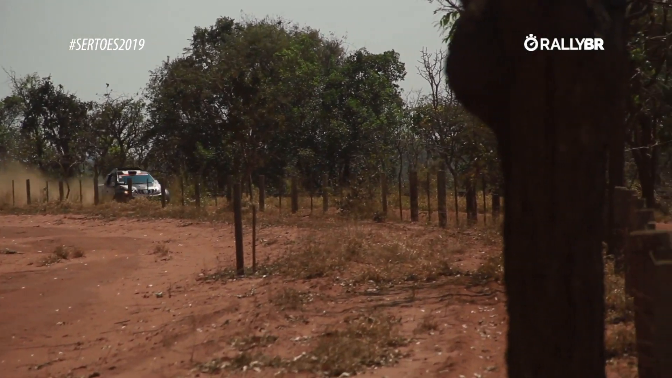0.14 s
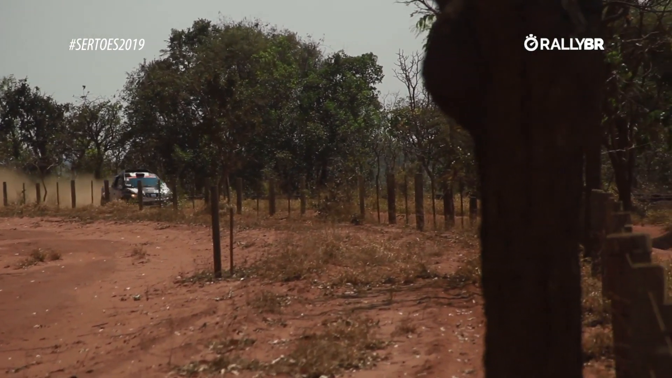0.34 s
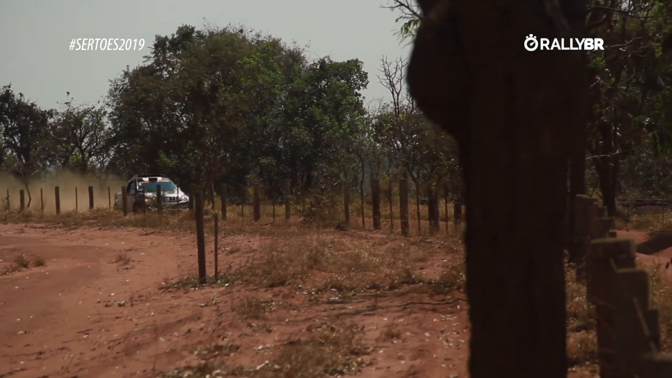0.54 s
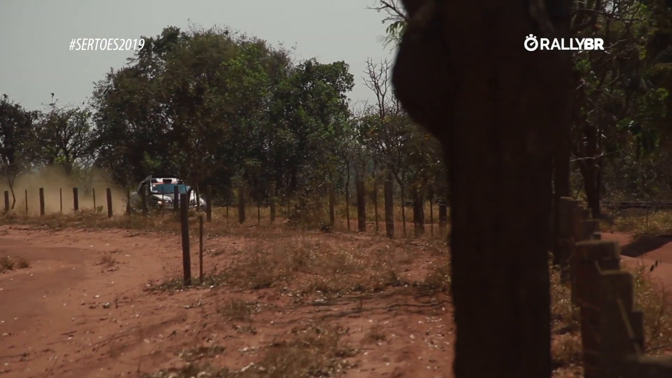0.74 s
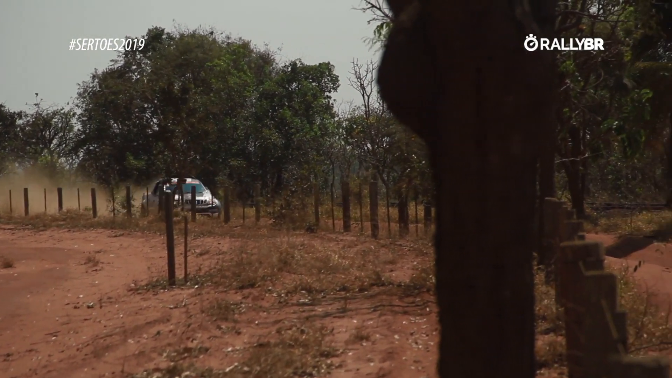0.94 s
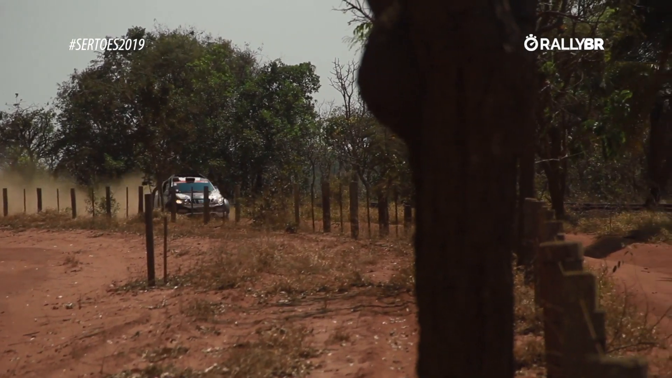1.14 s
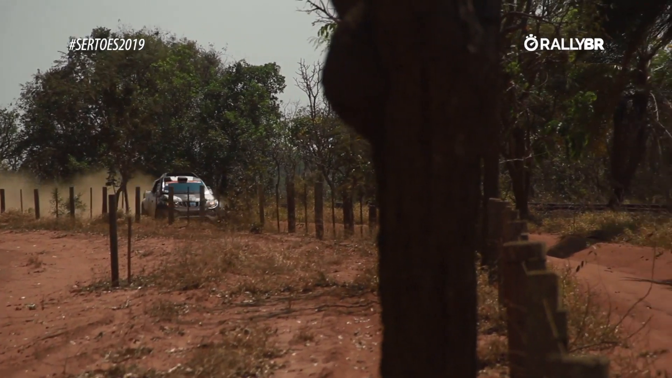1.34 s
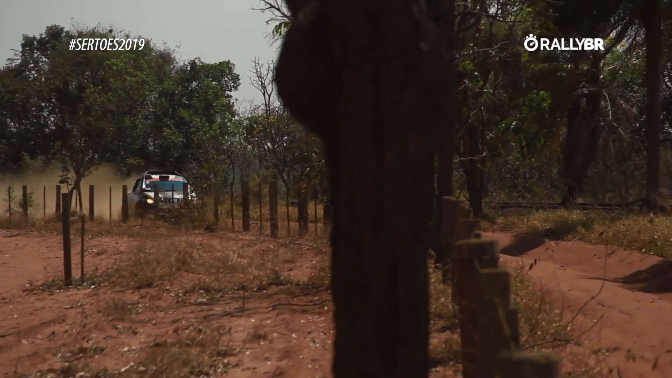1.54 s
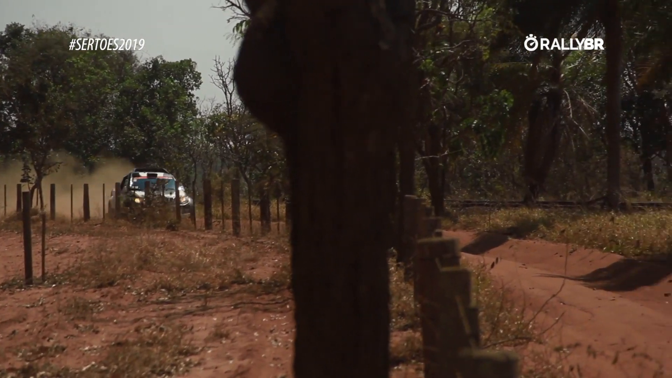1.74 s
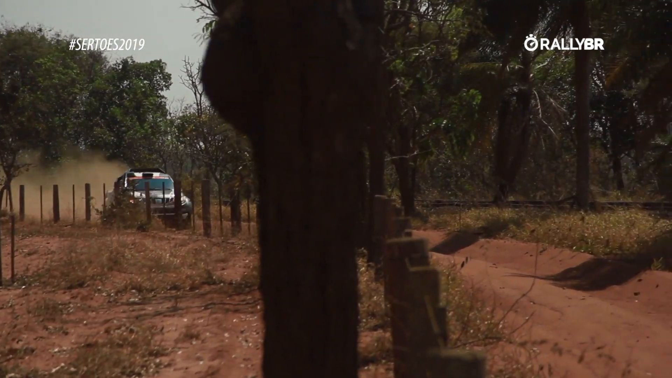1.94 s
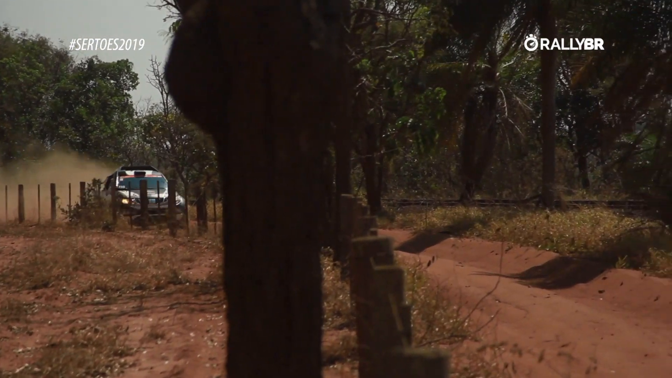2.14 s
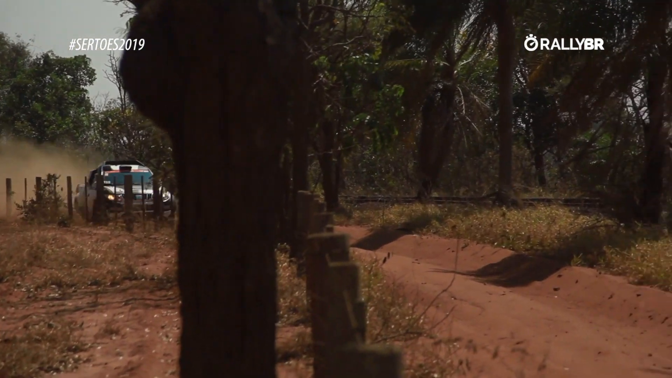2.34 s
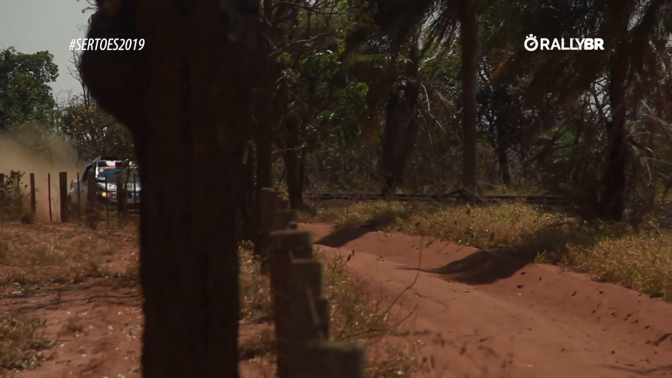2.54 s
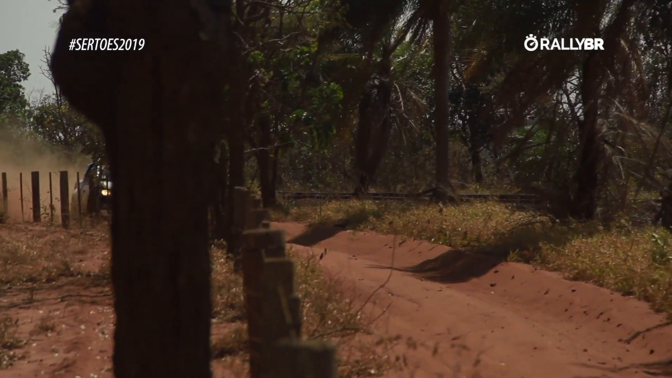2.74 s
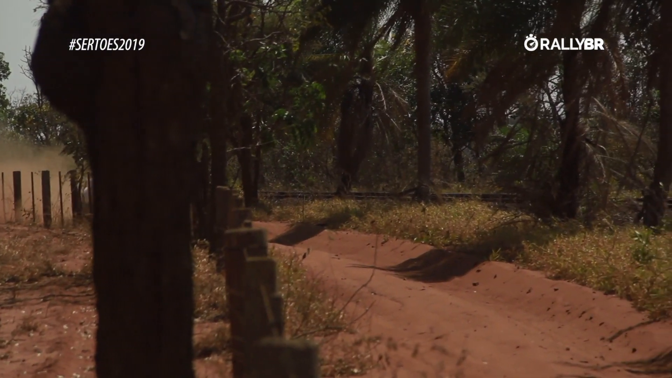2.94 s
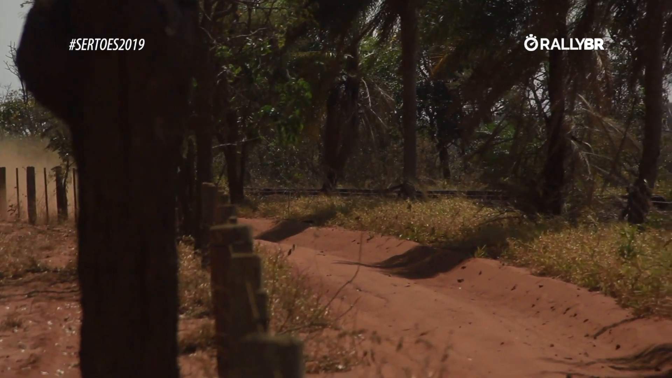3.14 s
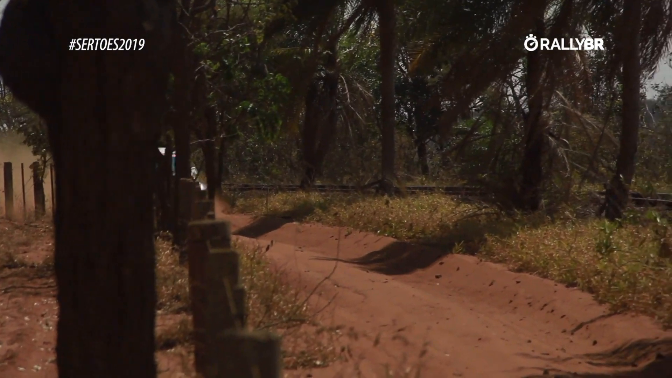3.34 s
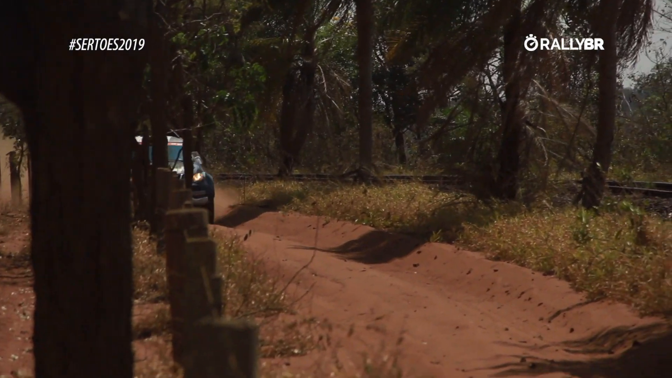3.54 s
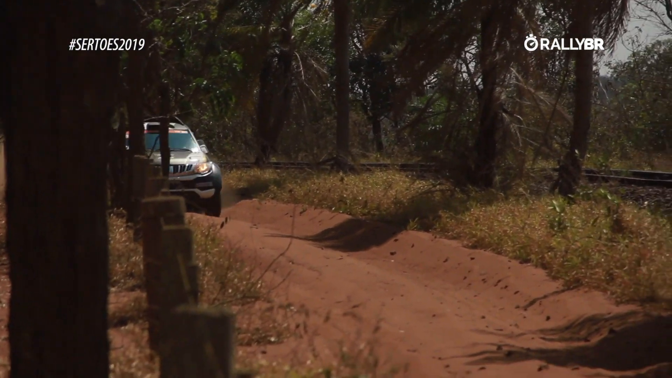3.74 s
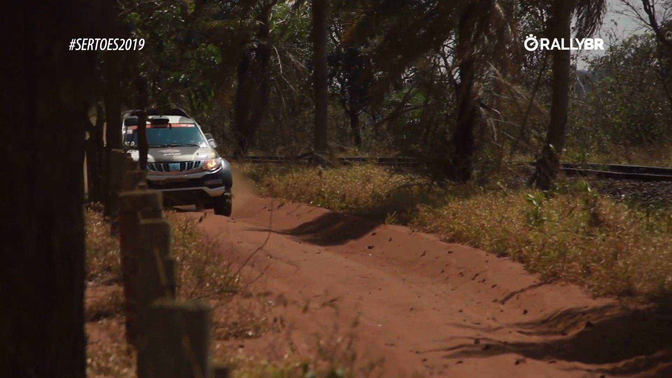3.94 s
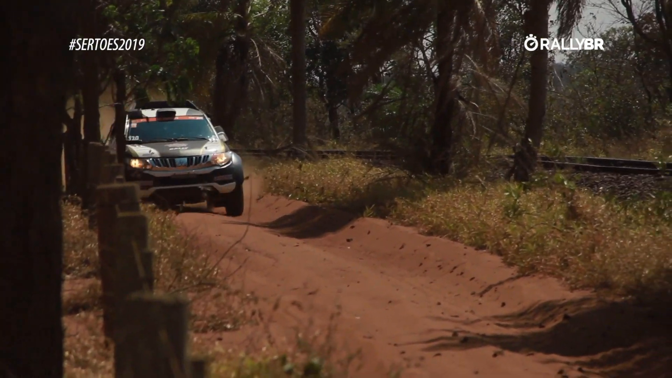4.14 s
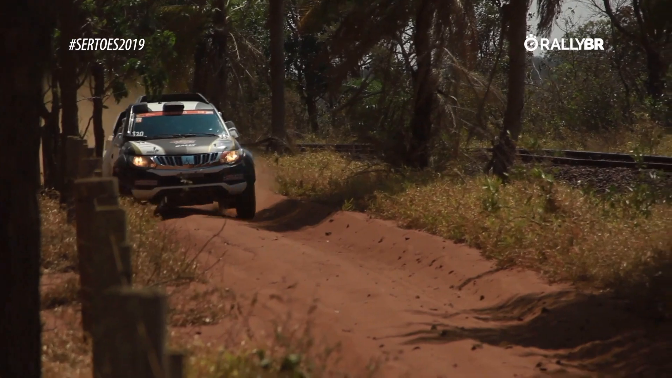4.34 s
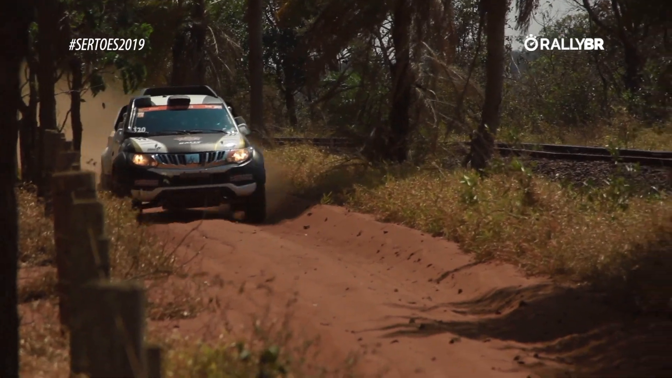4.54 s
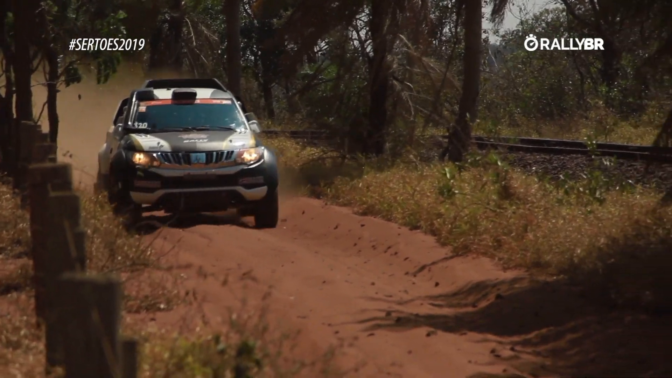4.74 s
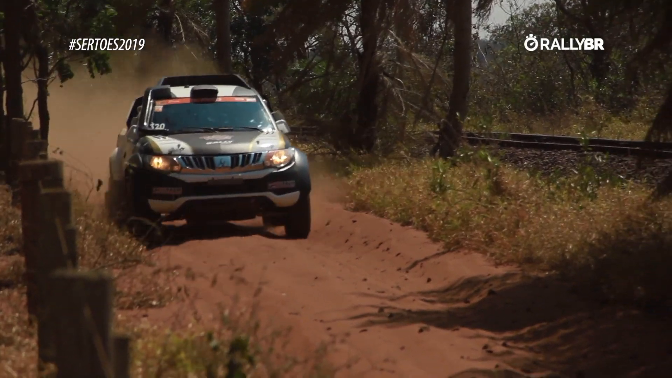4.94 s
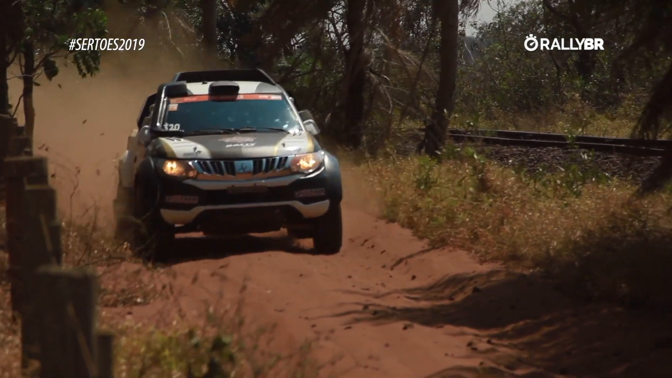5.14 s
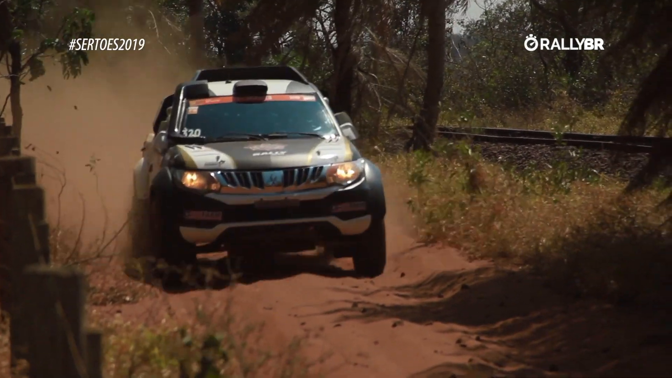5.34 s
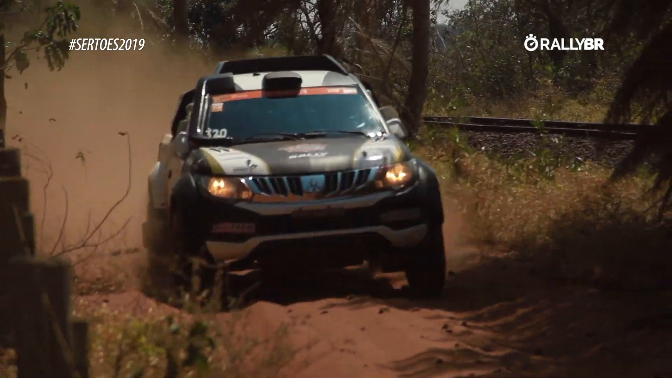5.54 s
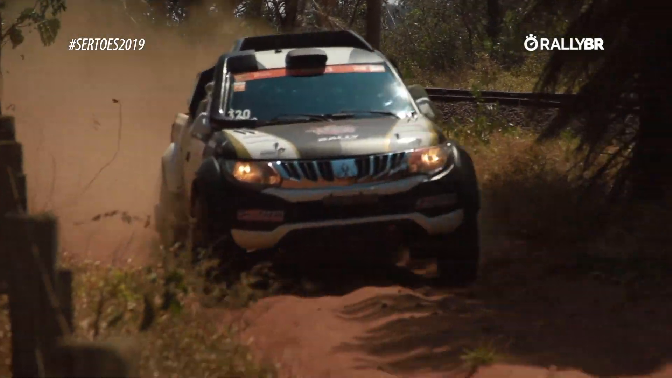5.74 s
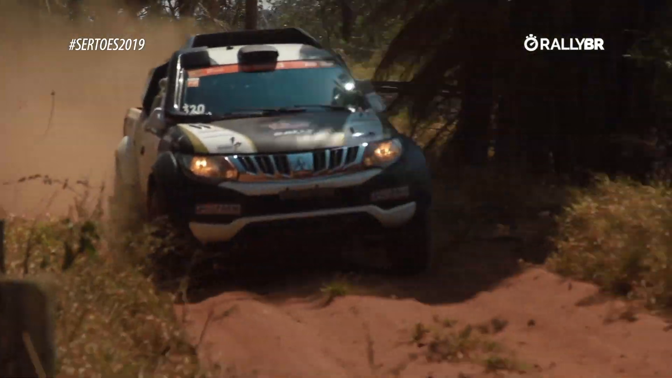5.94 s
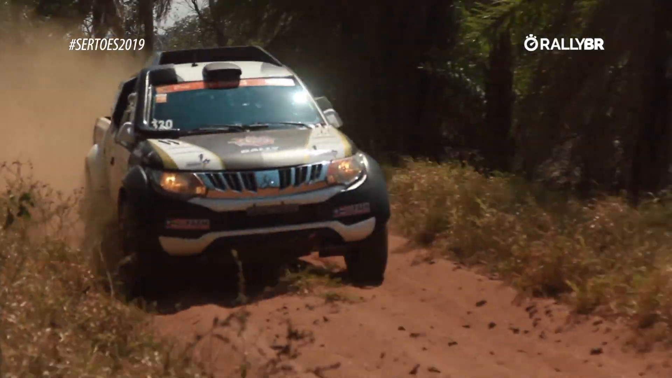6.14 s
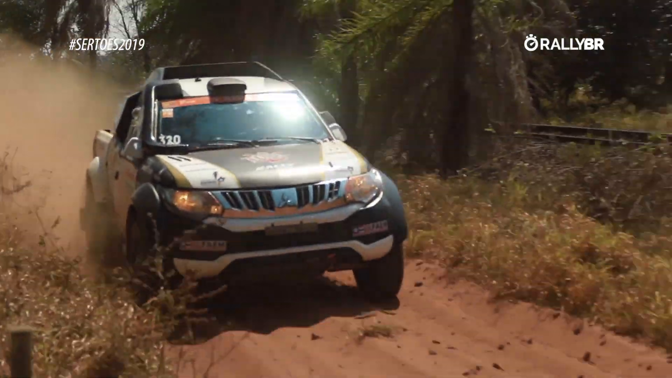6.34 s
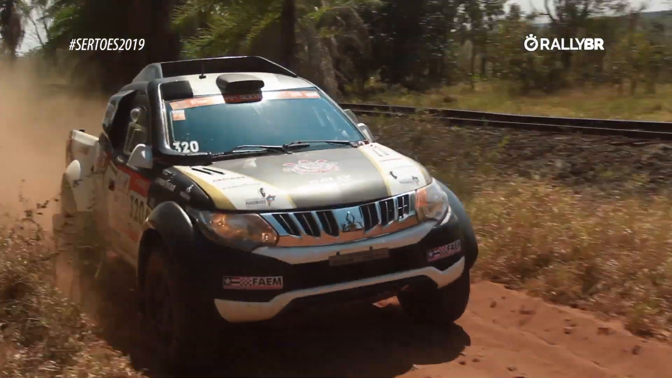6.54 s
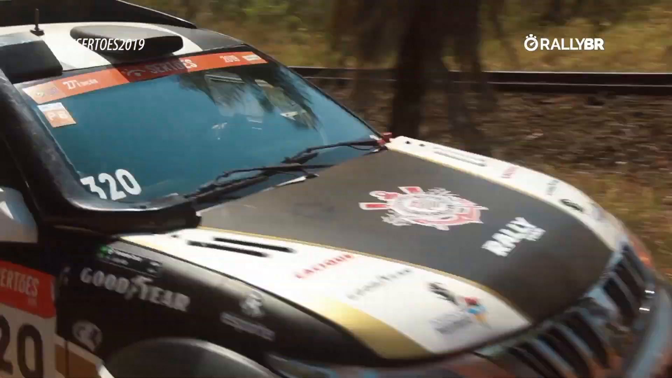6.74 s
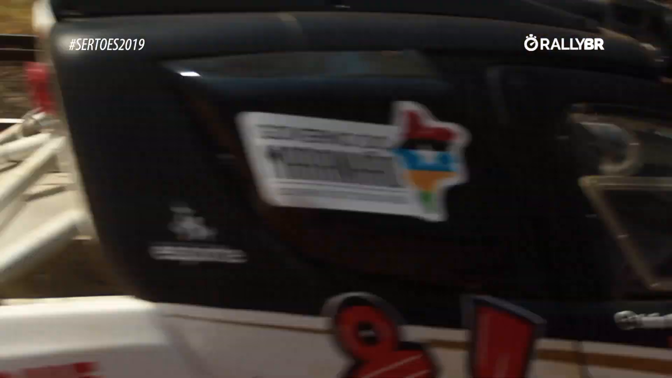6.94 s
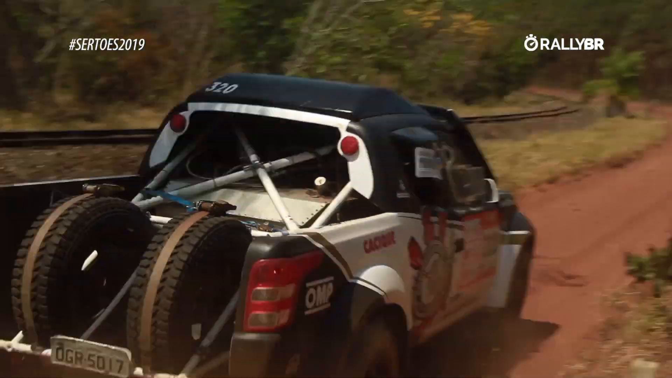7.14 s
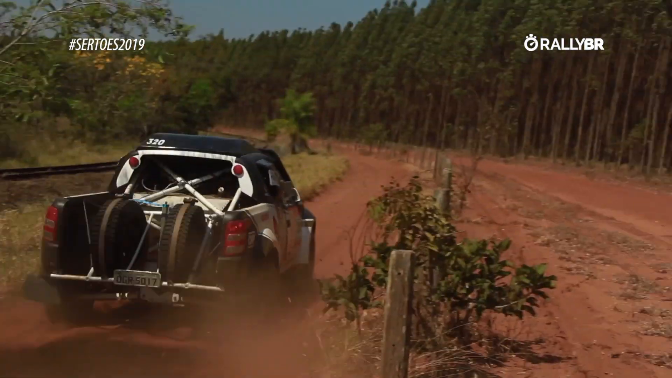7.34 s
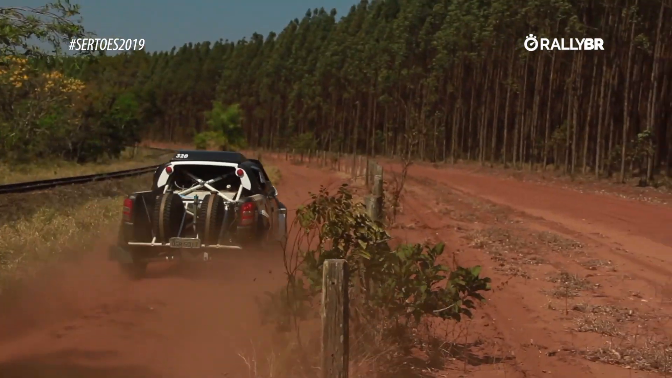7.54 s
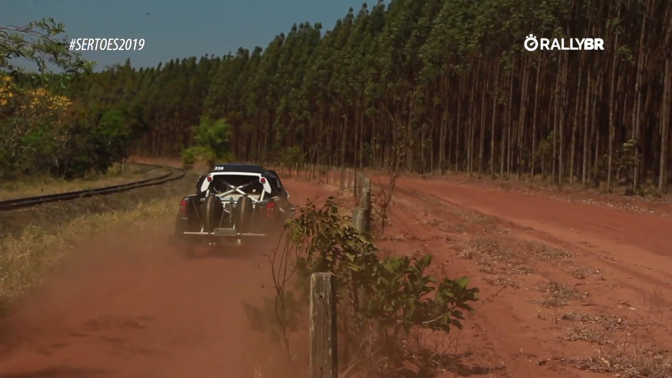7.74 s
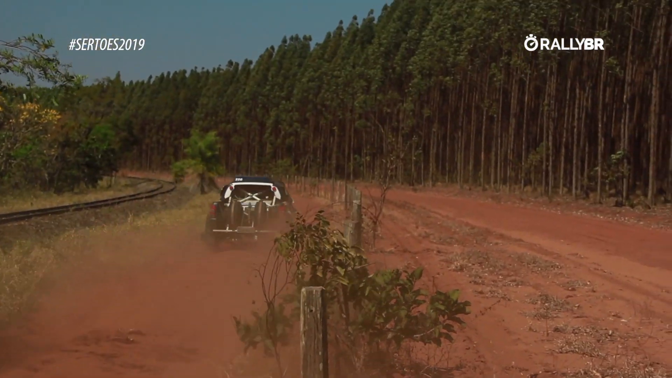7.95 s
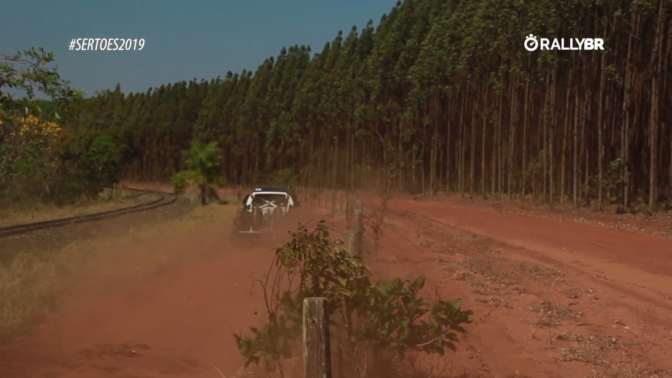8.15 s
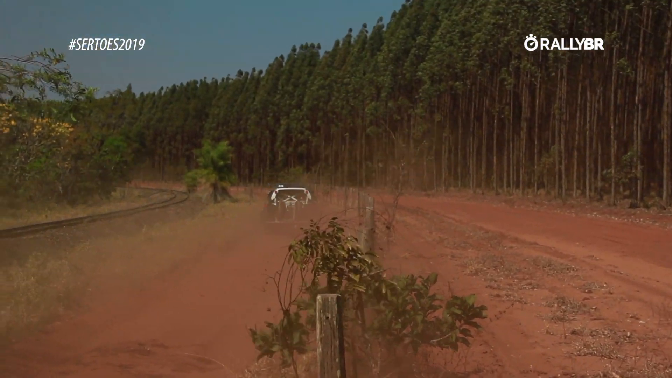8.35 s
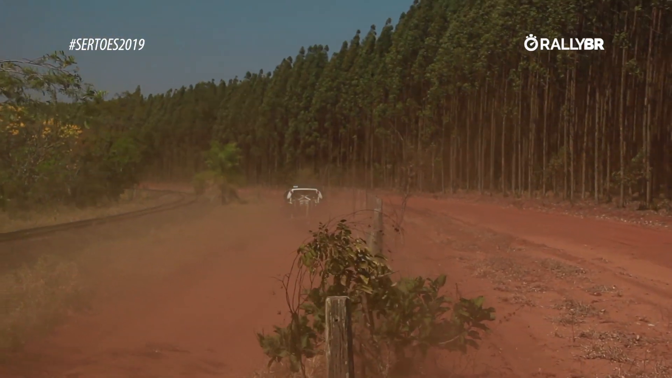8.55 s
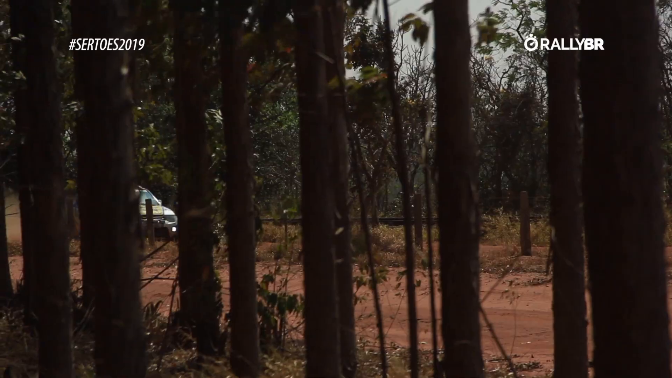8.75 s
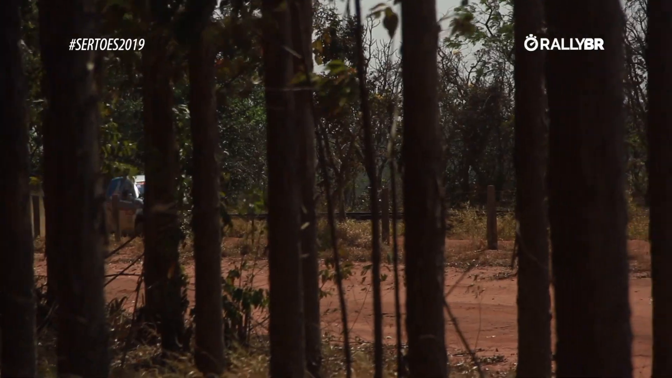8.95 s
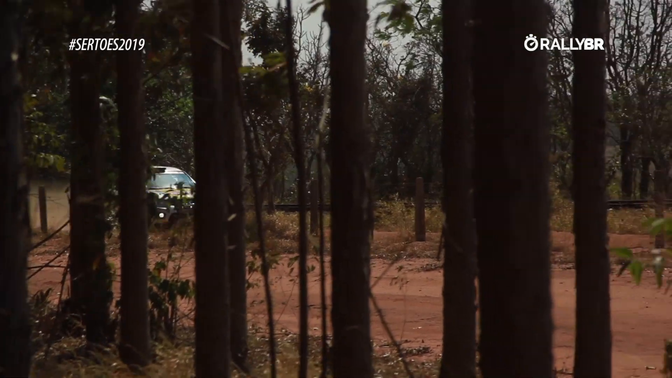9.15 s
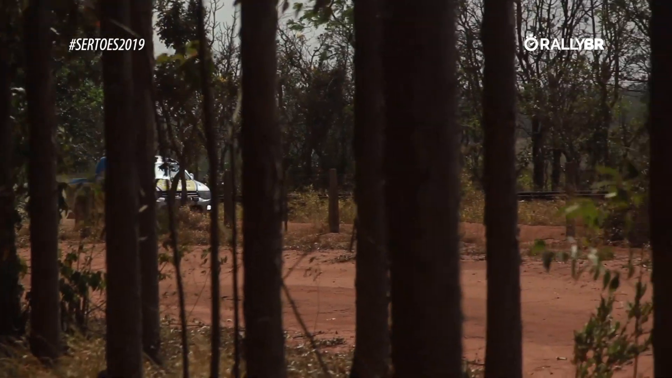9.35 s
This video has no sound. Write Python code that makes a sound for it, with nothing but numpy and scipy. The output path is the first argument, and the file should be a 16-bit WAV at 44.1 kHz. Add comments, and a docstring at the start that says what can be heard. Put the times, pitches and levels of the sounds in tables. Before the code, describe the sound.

A microphone beside a rural track catches soft air hiss and uneven wind puffs while a racing truck approaches at nearly constant pitch. It passes extremely close around seven seconds, harsh and overloaded, with rushing tyres and hissing grit. The engine note slides down and drops with a gear change, leaving wake rumble and a few stone knocks, then a sudden cut to a faint far engine.

```python
"""Rally truck on a dirt road

A four-cylinder truck comes round a bend, roars past hard enough to overload the microphone, shifts up
a gear and pulls away; then a cut to a second truck far off among trees. Engines are tones locked to the
firing; road, wind and outdoor hiss are coloured noise; puffs and stones are short pressure swings."""
import sys
import numpy as np
from scipy import signal
from scipy.io import wavfile
from scipy.ndimage import uniform_filter1d

SR = 44100
rng = np.random.default_rng(int(sys.argv[2]) if len(sys.argv) > 2 else 0)


def digitize_waveform(pressure):
    """Quantize a signal to 16-bit integers and store it at the path in sys.argv[1].

    Rows of a 2-D input are taken as channels; values are limited to [-1, 1].
    """
    field = np.atleast_2d(pressure).T
    bounded = np.clip(field, -1, 1)
    quanta = np.round(bounded * 32767).astype(np.int16)
    wavfile.write(sys.argv[1], SR, quanta)


N = 414540
CUT_S = 8.7262

# Outdoor air, noise colour: [pitch_hz, relative_db_per_hz]
AIR_COLOUR = [(290, -10), (500, -2), (630, -2.5), (727, -5), (1170, -3), (1330, -5.5), (1450, -3),
              (4660, -8), (8910, -13.5), (15600, -28)]
AIR_DB = -56

# Engine of the first truck, then the second:
# [start_s, firing_rate_hz, firing_tone_db, octave_tone_db, uneven_cylinder_tones_db]
ENGINE_LINES = [
    [(0.0, 211.5, -71, -61, -67), (0.45, 214.2, -59.5, -58.5, -69), (0.85, 210, -58.5, -63.5, -68),
     (1.8, 220, -55.5, -57.5, -74), (2.1, 217, -48.5, -62, -76), (2.8, 211.5, -47, -69.5, -74),
     (3.0, 214, -46.5, -63, -67), (3.25, 214.5, -40, -62.5, -60.5), (4.0, 210.7, -38.5, -50.5, -58),
     (4.6, 215.6, -34.5, -44, -50.5), (5.1, 217.3, -30, -43.5, -54), (5.42, 222, -32.5, -38.5, -46),
     (5.8, 219.6, -34, -37.5, -50), (6.1, 219.2, -31, -34, -63), (6.27, 219.1, -26, -30, -57),
     (6.4, 219, -29.5, -29.5, -45), (6.57, 217, -27, -33, -35), (6.77, 219.2, -7.5, -23.5, -25),
     (6.85, 220.1, -5.5, -23, -42), (6.97, 215.2, 5, -30, -17), (7.04, 209.2, 6, -29, -28),
     (7.13, 202.9, 0.5, -32, -7), (7.2, 198.5, -7, -29, -19.5), (7.26, 198.9, -5.5, -20.5, -33),
     (7.39, 198, -9, -30.5, -41), (7.46, 198.6, -6.5, -27, -32), (7.54, 194, -17.5, -27.5, -30),
     (7.61, 189.1, -17, -36.5, -33), (7.67, 181.4, -16, -51, -34), (7.81, 171.7, -28, -39, -42),
     (7.88, 155.8, -29.5, -44, -49), (7.95, 129.6, -25, -33.5, -55), (8.03, 125.5, -30, -42.5, -52),
     (8.1, 131.5, -32, -35, -41.5), (8.21, 128.9, -26, -32, -37.5), (8.71, 130.2, -20.5, -25, -53)],
    [(8.75, 225.5, -50, -68, -74), (8.87, 222, -66, -75, -76), (9.1, 220.5, -62, -62, -74),
     (9.25, 222, -52, -62, -66), (9.39, 227.4, -54.5, -53, -64)],
]
# Tones of cylinders that fire unevenly: {multiple of firing rate: relative_db}
UNEVEN_TONES = {1.5: 0, 2.5: -7, 3.5: -16}
# Upper harmonics of the firing: {multiple of firing rate: relative_db}
UPPER_TONES = {3: 0, 4: -3}
# How weaker tones follow the body roar, before fading:
# [db_at_middle_roar, slope_db_per_db, top_db_before_gear_change, higher_gear_change_db]
CRANK_FOLLOW = (-44, 0.8, -33, -6)
UPPER_FOLLOW = (-53, 1.66, -34, 13)
MIDDLE_ROAR_DB = -40
GEAR_HZ = 160  # firing slower than this counts as the higher gear
FADING_DB = 3  # depth of the weaker tones' coming and going when the firing tone is loudest
UPPER_BEHIND_DB = -14.5  # change in the upper harmonics once the nose has gone by
# Rasps, before their throb: [start_s, end_s, level_db, rise_db_per_s, fall_db_per_s]
TAILPIPE_RASP = (7.15, 7.33, -27, 70, 100)  # whine near 1 kHz
FRONT_RASP = (6.72, 6.95, -32, 80, 90)  # throbbing tone at six times the firing

# Road sound of the first truck, then the second: [start_s, body_roar_db, gravel_tyres_db, intake_whoosh_db]
ROAD_LEVELS = [
    [(0.0, -63, -75, -77), (0.25, -60, -63.5, -61.5), (1.2, -58.5, -60, -60), (2.1, -59.5, -57.5, -57.5),
     (2.5, -58.5, -63, -64), (2.95, -57, -78, -71), (3.2, -55.5, -61.5, -58), (3.5, -54, -55, -55.5),
     (4.25, -49.5, -60, -61.5), (4.55, -48.5, -52, -48.5), (5.05, -45, -48, -48.5), (5.5, -41, -44.5, -43),
     (5.85, -36.5, -42.5, -46), (6.2, -31, -43, -43), (6.41, -29, -35.5, -40.5), (6.49, -24.5, -30, -37),
     (6.56, -23, -31, -38.5), (6.7, -21, -24, -30.5), (6.77, -20, -22, -25.5), (6.84, -20, -14, -27.5),
     (6.98, -9, -6, -9.5), (7.05, -8, -2, -12.5), (7.18, -11.5, -11.5, -25), (7.3, -18, -21.5, -33.5),
     (7.47, -25, -27, -35), (7.54, -26, -39, -44), (7.74, -31, -40.5, -47.5), (7.81, -33.5, -47, -51),
     (7.88, -30.5, -46.5, -51), (8.02, -38, -48.5, -51), (8.09, -40.5, -50.5, -60), (8.16, -42, -46.5, -53),
     (8.22, -37, -55.5, -58), (8.55, -41, -54.5, -65), (8.71, -41.5, -46, -63)],
    [(8.75, -60, -57.5, -57), (8.87, -54, -58.5, -62), (9.05, -60, -59, -57), (9.2, -58, -64, -74),
     (9.39, -56.5, -68, -74)],
]
# Flying grit of the first truck, then the second: [start_s, level_db]
GRIT_LEVELS = [
    [(0.0, -67), (1.3, -68), (1.8, -72), (5.0, -84), (5.85, -75), (6.02, -58), (6.5, -51.5), (6.76, -40.5),
     (6.88, -39), (7.1, -29), (7.2, -36.5), (7.46, -38.5), (7.55, -42.5), (7.85, -47.5), (8.45, -55.5),
     (8.6, -61), (8.71, -60)],
    [(8.75, -70), (9.05, -65), (9.39, -65)],
]
# Road noise colours: [pitch_hz, relative_db_per_hz]
ROAR_FRONT_COLOUR = [(60, 4.5), (120, 5), (250, 3.5), (450, 0.5), (700, -2), (1000, -7.5), (1600, -19.5),
                     (3000, -47)]
ROAR_BEHIND_COLOUR = [(60, -6), (120, -7), (250, 5), (380, -4), (500, 1), (620, -9.5), (780, -10.5),
                      (1000, -7), (1300, -44), (3000, -47)]
TYRE_COLOUR = [(500, -33), (800, -8), (1080, 1), (1500, -2.5), (2300, -6.5), (3200, -12.5), (6000, -39)]
WHOOSH_COLOUR = [(1800, -1), (2800, 0), (3800, -0.5), (5000, -4.5), (6500, -11), (8500, -19), (15000, -52)]
GRIT_COLOUR = [(4000, -45), (6500, -5.5), (8500, 0), (12000, -1.5), (15500, 0)]
TURN_S, TURN_LENGTH_S = 7.5, 0.43  # the tail turns toward the microphone
ALONGSIDE_DB = -27  # tyre level above which single stones stand out

# Buffeting before the cut, then after it: [start_s, level_db]
WIND_LEVELS = [
    [(0.0, -58), (0.12, -46.5), (0.36, -48), (0.46, -43.5), (0.8, -45.5), (1.28, -42), (1.55, -49),
     (2.4, -49.5), (2.8, -51.5), (2.96, -60), (3.1, -50.5), (3.8, -52.5), (4.3, -48), (5.2, -43.5),
     (5.4, -39), (5.5, -44), (5.66, -35.5), (5.75, -49), (5.87, -41), (6.26, -41), (6.34, -35), (6.5, -36),
     (6.85, -28), (7.18, -42), (7.5, -33), (8.72, -36)],
    [(8.76, -48), (9.0, -44), (9.15, -44.5), (9.22, -41.5), (9.4, -43)],
]
# Buffeting noise colour: [pitch_hz, relative_db_per_hz]
BUFFET_COLOUR = [(10, -3), (35, -0.5), (60, -3), (110, -8.5), (180, -6.5), (300, -24.5), (500, -31),
                 (1000, -70)]
# Eddies of air dragged by the truck: [peak_s, level_db]
WAKE_EDDIES = [(6.44, -27), (7.55, -17), (7.79, -19.5), (8.14, -24), (8.36, -25.5)]
WAKE_RISE, WAKE_FALL = 364, 57.6  # dB per s
LUMP_DB, LUMP_FALL = -14, 180  # buffeting around each puff: dB against the puff, dB per s both ways

# Wind puffs on the capsule: [centre_s, level_db, pitch_hz, length_cycles, triple_pitch_flutter_share]
PUFF_ROWS = [(.175, -39, 108, 1.1, 0.23), (.284, -31.5, 73, 1.1, 0.19), (.689, -21.5, 104, 0.74, 0.61),
             (.896, -25.5, 123, 0.89, 0.1), (0.966, -32.5, 70, 0.92, 0.21), (1.111, -35.5, 78.7, 1.7, 0.14),
             (1.36, -26.5, 55, 1.13, 0.44), (1.655, -31.5, 95, 1.16, 0.21), (1.71, -36, 83, 1.66, 0.16),
             (2.25, -32.5, 64.4, 1.2, 0.17), (2.38, -38, 60, 1.1, 0.17), (2.475, -36.5, 68.3, 1.205, 0.22),
             (8.25, -17, 93.6, 1.03, 0.46), (8.95, -34.5, 105, 8.9, 0.057), (9.248, -34, 45.14, 0.66, 0.56)]
# Stones knocking under the leaving truck, same columns as the puffs
STONE_ROWS = [(7.785, -22, 1470, 1.34, 0.047), (7.851, -13.5, 470.6, 1.4, 0.092),
              (7.866, -27, 961, 2.9, 0.21), (7.917, -28, 809, 2.6, 0.2), (8.093, -29, 900, 1.2, 0.3),
              (8.137, -30, 679, 1.26, 0.43), (8.155, -31, 906, 1.5, 0.3), (8.303, -25.5, 481, 2.13, 0.11)]

CEILING_DB = -6  # input stage overload
EDGE_HZ = 15750  # top of the band


def gain_of(db):
    """Amplitude factor for a level in dB."""
    return 10 ** (np.asarray(db) / 20)


def evened(x):
    """Scales a signal to an RMS of one."""
    return x / np.sqrt(np.mean(x ** 2) + 1e-20)


def ramp(start_s, length_s):
    """Straight climb from 0 to 1."""
    return np.clip((np.arange(N) / SR - start_s) / length_s, 0, 1)


def play(tables):
    """Reads each column at every sample; the second table takes over abruptly at the cut."""
    t = np.arange(N) / SR
    early, late = np.transpose(tables[0]), np.transpose(tables[1])
    after = ramp(CUT_S, 1 / 2500)
    columns = []
    for before_values, after_values in zip(early[1:], late[1:]):
        before_line = np.interp(t, early[0], before_values)
        after_line = np.interp(t, late[0], after_values)
        columns.append((1 - after) * before_line + after * after_line)
    return columns


def swell(start, end, peak_db, rise, fall):
    """A level that climbs steadily in dB, holds, and sinks."""
    t = np.arange(N) / SR
    return peak_db - rise * np.maximum(start - t, 0) - fall * np.maximum(t - end, 0)


def drift(rate_hz):
    """Random wander of unit RMS: noise low-passed at rate_hz, drawn once per 64 samples."""
    steps = rng.standard_normal(N // 64 + 2)
    lowpass = signal.butter(2, rate_hz, fs=SR / 64, output="sos")
    slow = signal.sosfiltfilt(lowpass, steps, padtype="even", padlen=len(steps) // 2)
    return np.interp(np.arange(N) / 64, np.arange(len(slow)), evened(slow))


def hiss(colour, patchy_db, size=512):
    """Unit-RMS noise of a given colour whose spectrum drifts in random patches."""
    frames, hz = 4 * N // size + 5, np.fft.rfftfreq(size, 1 / SR)
    real, imaginary, patches = rng.standard_normal((frames, len(hz), 3)).T
    patches = uniform_filter1d(patches, size=8, axis=0)  # across pitch
    patches = evened(uniform_filter1d(patches, size=16, axis=1))  # across time
    f, db = np.transpose(colour)
    shape_db = np.interp(np.log(hz + 1), np.log(f + 1), db, left=db[0] - 34)
    spectrum = (real + 1j * imaginary) * gain_of(shape_db[:, None] + patchy_db * patches)
    return evened(signal.istft(spectrum, nperseg=size, noverlap=3 * size // 4)[1][:N])


def outdoor_air():
    """A steady bed of coloured hiss with a faint sway in level."""
    return gain_of(AIR_DB + 0.4 * drift(1.6)) * hiss(AIR_COLOUR, patchy_db=1.5)


def following_tone(law, roar_db, geared, far):
    """Level of a weaker engine tone that follows the body roar and fades in and out close by."""
    middle_db, slope, top_db, gear_db = law
    level_db = np.minimum(middle_db + slope * (roar_db - MIDDLE_ROAR_DB), top_db)
    return level_db + gear_db * geared + FADING_DB * (1 - far) * drift(3.0)


def engine():
    """Tones locked to the firing; echoes off ground and trees make each one waver, less so close by.
    The pipe staggers the higher tones' phases, so they do not all peak together."""
    hz, firing_db, octave_db, uneven_db = play(ENGINE_LINES)
    roar_db = play(ROAD_LEVELS)[0]
    geared = np.clip((GEAR_HZ - hz) / 20, 0, 1)
    far = np.clip((-12.5 - firing_db) / 16, .15, 1)  # judged by the firing tone
    crank_db = following_tone(CRANK_FOLLOW, roar_db, geared, far)
    upper_db = following_tone(UPPER_FOLLOW, roar_db, geared, far)
    upper_db += UPPER_BEHIND_DB * ramp(7.2, 0.29)
    turns = 2 * np.pi * np.cumsum(hz * (1 + 0.00313 * drift(30.1))) / SR
    facing = np.pi * (1 - ramp(6.8, 0.4))  # octave phase: sharp dips in front, sharp peaks behind

    orders = [(1, firing_db), (2, octave_db), (.5, crank_db)]  # (multiple of firing rate, level)
    orders += [(k, uneven_db + db) for k, db in UNEVEN_TONES.items()]
    orders += [(k, upper_db + db) for k, db in UPPER_TONES.items()]
    rasp_db = swell(*TAILPIPE_RASP) + 4 * drift(40.)  # it throbs
    orders += [(5, rasp_db), (5.5, rasp_db - .8), (6.5, rasp_db - 5.)]
    orders += [(6, swell(*FRONT_RASP) + 7 * drift(45.))]

    out = np.zeros(N)
    for k, db in orders:
        level = np.sqrt(2) * gain_of(db + 1.7 * far * drift(25.0))
        phase = k * turns + 0.97 * k * (k - 1) * (k - 2)
        phase = phase + facing * (k == 2) + 0.078 * k * far * drift(25.0)
        out += level * np.cos(phase)
    return out


def road():
    """Body roar, tyre rasp, intake whoosh and grit; bumps shake them together, gravel makes them grainy."""
    roar_db, tyres_db, whoosh_db = play(ROAD_LEVELS)
    grit_db = play(GRIT_LEVELS)[0]
    behind = ramp(TURN_S, TURN_LENGTH_S)
    grain_db = (0.75 + 0.15 * np.maximum(tyres_db - ALONGSIDE_DB, 0)) * drift(300.0)
    # equal-power blend as the tail comes round
    body = np.sqrt(1 - behind) * hiss(ROAR_FRONT_COLOUR, patchy_db=3.0, size=2048)
    body += np.sqrt(behind) * hiss(ROAR_BEHIND_COLOUR, patchy_db=5.0, size=2048)
    roar = gain_of(roar_db) * body
    tyres = gain_of(tyres_db + grain_db) * hiss(TYRE_COLOUR, patchy_db=2.0, size=1024)
    whoosh = gain_of(whoosh_db + 0.51 * grain_db) * hiss(WHOOSH_COLOUR, patchy_db=0.1)
    grit = gain_of(grit_db + .3 * grain_db) * hiss(GRIT_COLOUR, patchy_db=1.0)
    bumps = gain_of(0.17 * drift(4.0))
    return bumps * (roar + tyres + whoosh + grit)


def wind():
    """Lumpy low pressure on the capsule, swelling around each puff and each eddy of the wake."""
    before_cut = np.arange(N) / SR < CUT_S
    levels = [play(WIND_LEVELS)[0]]
    for s, db, *_ in PUFF_ROWS:
        levels.append(swell(s, s, db + LUMP_DB, LUMP_FALL, LUMP_FALL))
    for s, db in WAKE_EDDIES:
        levels.append(np.where(before_cut, swell(s, s, db, WAKE_RISE, WAKE_FALL), -99))
    lumps_db = 1.8 * drift(25.) + 1.2 * drift(6.)
    loudest_db = np.max(levels, axis=0)
    return gain_of(loudest_db + lumps_db) * hiss(BUFFET_COLOUR, patchy_db=2.5, size=2048)


def knocks(rows):
    """Each puff or stone is a brief dip in pressure under a bell-shaped fade, centred on its time."""
    out = np.zeros(N)
    for s, level_db, hz, cycles, flutter_share in rows:
        u = np.arange(-2000, 2000) / SR * hz  # time in cycles
        flutter = np.cos(2 * np.pi * 3 * u) + 0.2 * np.sin(2 * np.pi * 4.83 * u)
        swing = -np.cos(2 * np.pi * u + .5) + flutter_share * flutter
        bell = np.exp(-(2 * u / cycles) ** 2)
        first = round(s * SR) - 2000
        out[first:][:len(u)] += gain_of(level_db) * swing * bell
    return out


def scene():
    """Air, trucks, wind and knocks summed to one channel."""
    trucks = engine() + road()
    return (outdoor_air() + trucks + wind() + knocks(PUFF_ROWS) + knocks(STONE_ROWS))[None]


def record(dry):
    """The input stage clips flat at its ceiling, as when the truck is alongside; then the band limit."""
    ceiling = gain_of(CEILING_DB)
    clipped = np.clip(dry, -ceiling, ceiling) - .0027  # a small steady offset
    edge = signal.firwin(2047, EDGE_HZ, window=("kaiser", 14), fs=SR)
    return signal.oaconvolve(clipped, edge[None], "same")


dry = scene()
out = record(dry)
digitize_waveform(out)
```